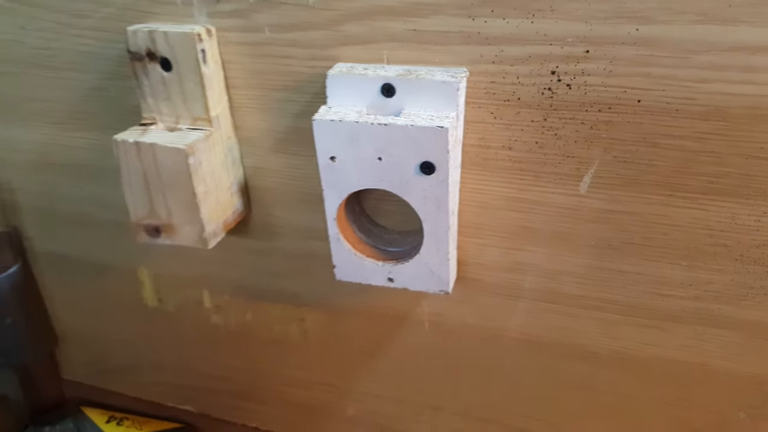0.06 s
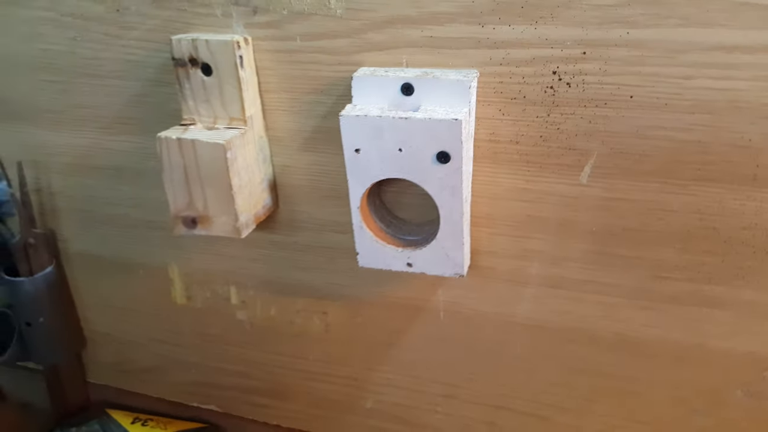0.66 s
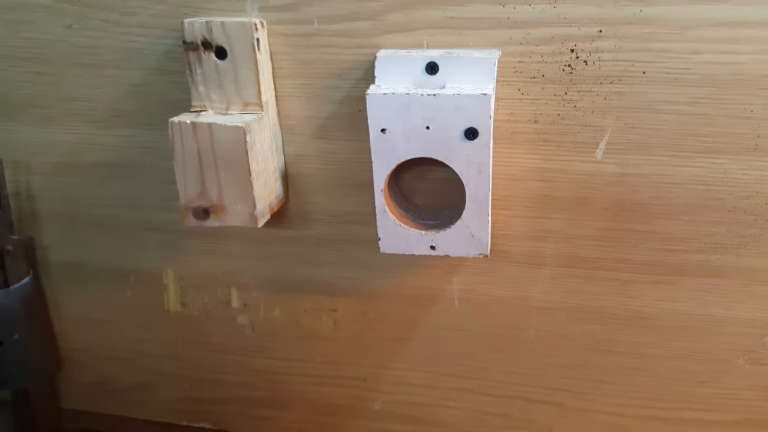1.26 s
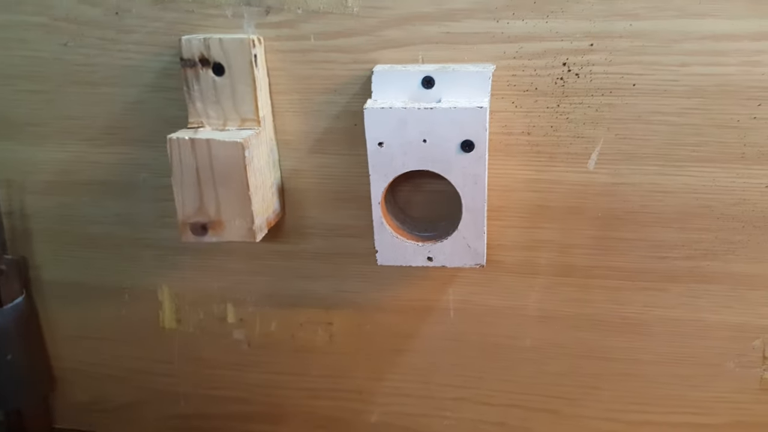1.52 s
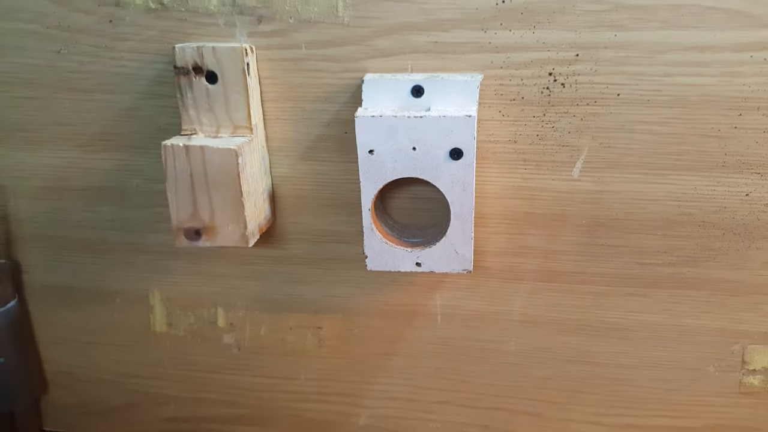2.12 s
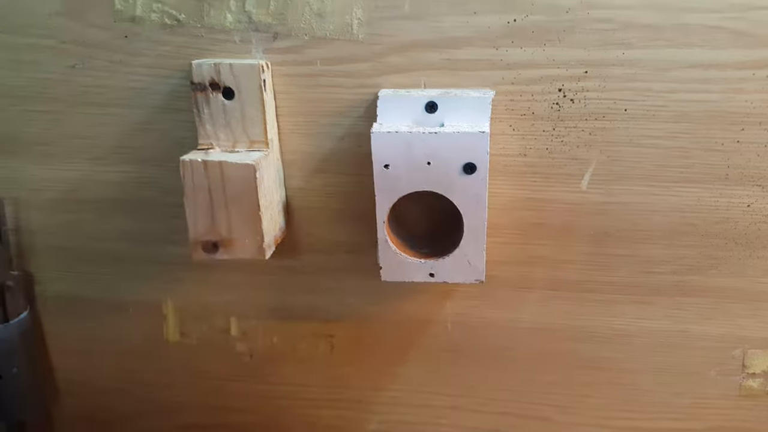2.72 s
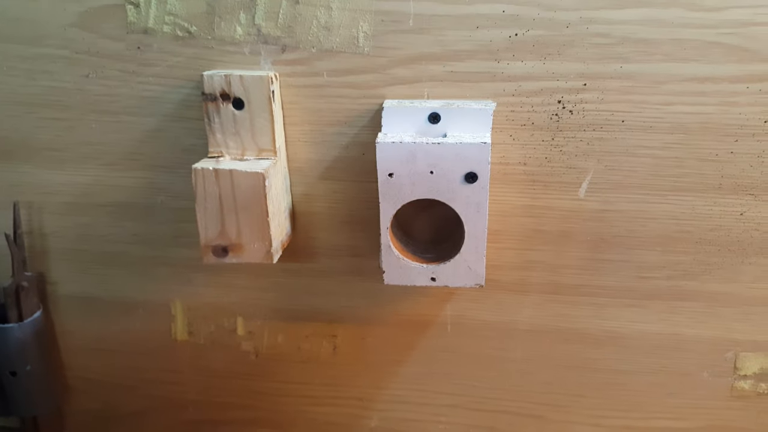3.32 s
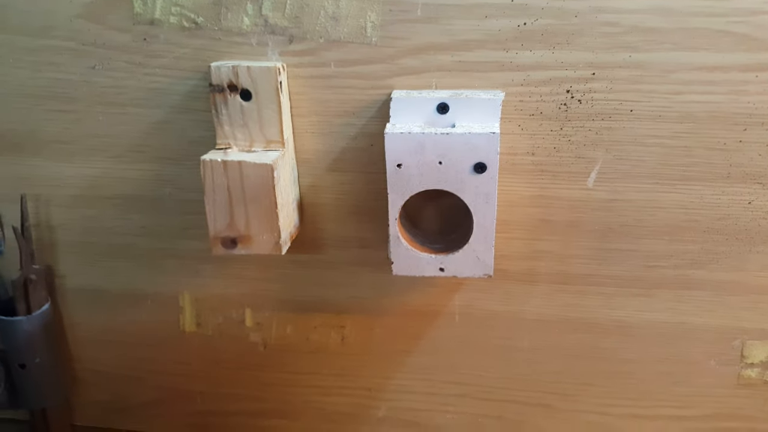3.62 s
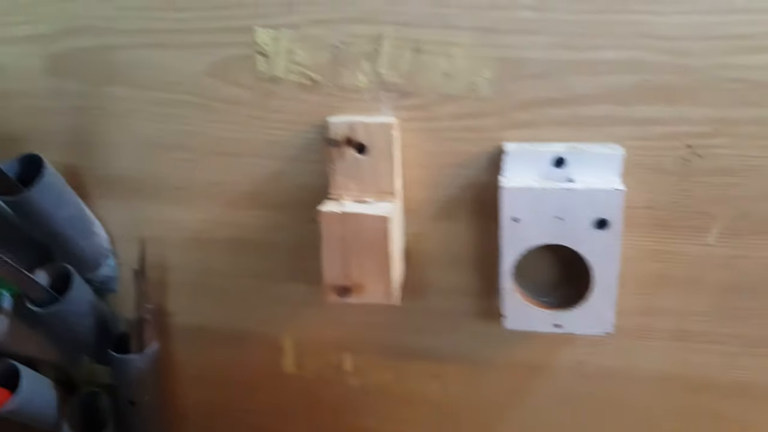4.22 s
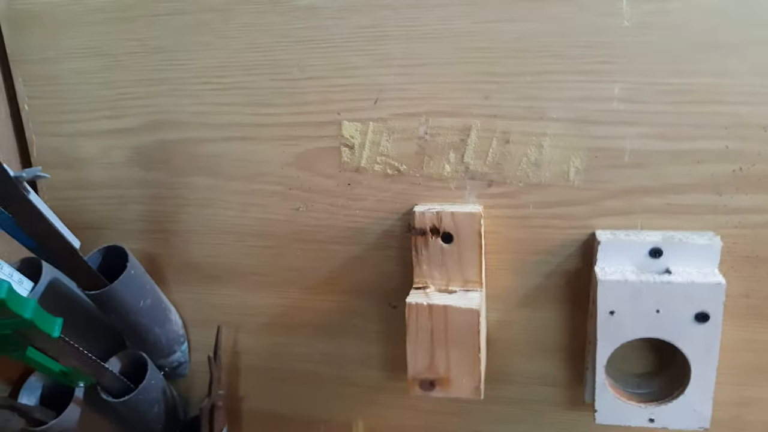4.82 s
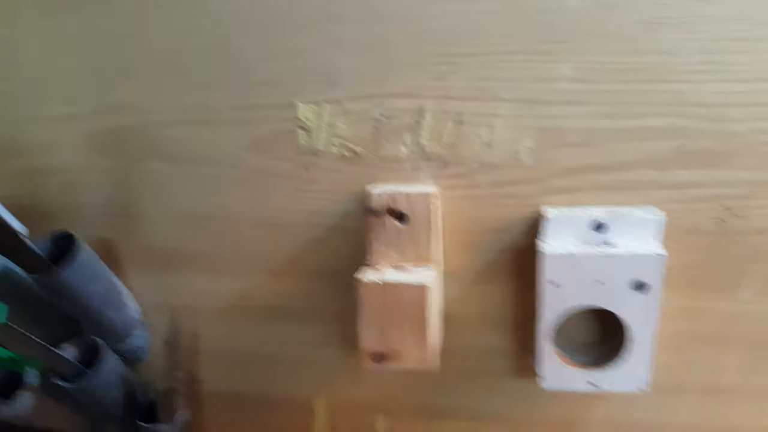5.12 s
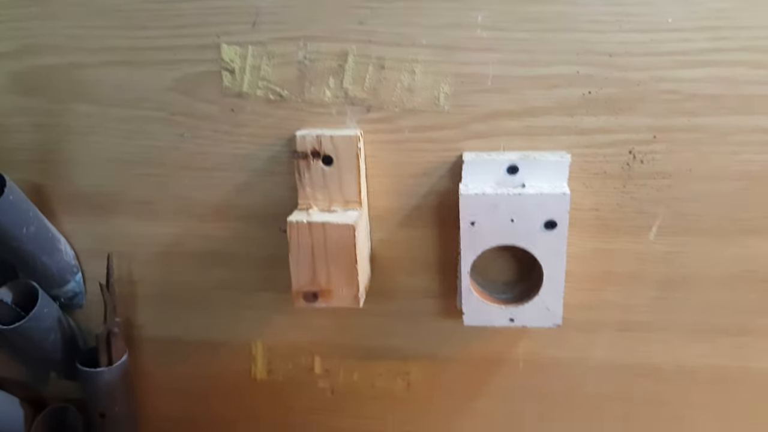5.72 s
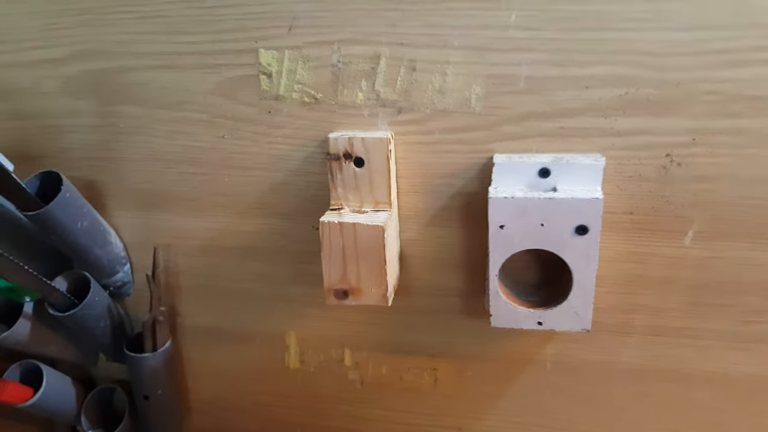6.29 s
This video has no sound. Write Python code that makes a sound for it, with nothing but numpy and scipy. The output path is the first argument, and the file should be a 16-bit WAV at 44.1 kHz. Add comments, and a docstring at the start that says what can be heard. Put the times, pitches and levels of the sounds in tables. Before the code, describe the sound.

A low hum and rumble fill a small workshop, heard through a close, hand-held stereo microphone. After a light tap and a faint scrape, a spool knocks sharply on a wooden wall panel at about 0.8 seconds, and again more softly at 1.1. A quieter stretch follows, with faint sleeve rustle, small clicks and a light slide near 2.6 seconds. From about 3 to 4.5 seconds the spool rubs and fumbles in its wooden holder, making a run of dull taps, strongest near 3.9, while the rumble swells slightly. The sleeve rustles and the hand bumps the microphone with low thumps between 4.4 and 5 seconds. Two short, hoarse scrapes come at about 4.9 and 5. At 5.6 a spool lands on the holder with a hard knock and bounces once. Soft rustling, two small bumps and a sharp click near 6.2 seconds finish it.

```python
"""Spools knock into a wooden holder on a wall panel, close to a hand-held stereo microphone in a small
workshop. Two knocks on the panel, rubbing and fumbling, two short scrapes, then a hard knock with one
bounce. Each blow rings the wood's modes and echoes off the nearest surfaces; rubs and scrapes are noise
that catches and slips. Close up, a sleeve rustles among small clicks and light woody taps, and the hand
bumps the microphone. A low hum and rumble lie behind it all."""
import sys
import numpy as np
from scipy import signal
from scipy.fft import rfft, irfft
from scipy.io import wavfile

SR = 44100
rng = np.random.default_rng(int(sys.argv[2]) if len(sys.argv) > 2 else 0)


def log_audio(samples):
    """Write samples as a 16-bit WAV file to the path given in sys.argv[1]."""
    # one column per channel
    frames = np.atleast_2d(samples).T
    # limit to full scale, then quantise
    limited = np.clip(frames, -1, 1)
    pcm = np.round(limited * 32767).astype(np.int16)
    wavfile.write(sys.argv[1], SR, pcm)


N = 280167
TIME = np.arange(N) / SR
FREQS = np.fft.rfftfreq(N, 1 / SR)

# room tone, the low rumble and the still air: frequency_hz, level_db
RUMBLE_SPECTRUM = [(15, -38), (30, -14), (42, -5), (51, 0), (62, -0.5), (80, -9), (110, -2), (160, -13.5),
                   (250, -25.5), (500, -57.5)]
AIR_SPECTRUM = [(88, -44), (150, 3.5), (231, -8), (270, -2), (348, -6.5), (534, -6.5), (871, -11),
                (998, -7.5), (1360, -13.5), (1940, -19), (2810, -20.5), (8230, -40.5), (16000, -27)]
# how alike the two sides of the microphone hear a noise: frequency_hz, correlation
STEREO_LIKENESS = [(50, .99), (250, 0.9), (600, 0.8), (1200, 0.13), (2500, 0.071), (5000, 0.036),
                   (15000, 0.033)]
# the workshop's reverberation: frequency_hz, t60_s
ROOM_DECAY = [(100, 0.51), (400, 0.57), (1000, 0.26), (2500, 0.4), (6000, 0.19), (15000, 0.13)]
# echoes off the nearest surfaces, before the right side's extra lag: left_s, left_gain, right_s, right_gain
PANEL_ECHOES = [(.00206, 0.45, .00218, 0.36), (.00706, 0.27, .007, 0.084), (.01184, .25, .01171, .2),
                (0.0163, 0.12, 0.02, 0.2)]
HOLDER_ECHOES = [(.0017, 0.051, 0.0024, -0.088), (.0066, 0.11, .0068, 0.28), (.00802, .33, .00802, .22),
                 (0.0178, 0.013, .01919, 0.076)]
HANDLING_ECHOES = [(.00205, .17, .00205, 0.058), (.0047, .25, .0047, 0.15)]

# swells of the rumble, the sleeve, a spool rubbing and a spool sliding: peak_s, rise_s, fall_s, level_db
RUMBLE_SWELLS = [(3.03, .33, 0.24, -45.5), (3.55, 0.2, 0.23, -52), (4.18, 0.46, 0.41, -45)]
SLEEVE_STROKES = [(0.15, 0.44, 0.41, -63), (0.85, 0.13, 0.3, -60), (1.58, 0.36, 0.28, -68),
                  (2.62, 0.32, 0.12, -59), (4.63, 0.3, .11, -46), (5.15, 1, 0.43, -57.5),
                  (5.87, 0.24, 0.19, -52), (6.24, 0.17, 0.11, -59.5)]
RUB_STROKES = [(1.02, 0.15, 0.18, -53), (3.35, 0.6, 0.38, -56), (3.72, 0.15, 0.13, -50.5),
               (4.06, 0.25, 0.27, -50.5), (4.46, 0.31, 0.4, -48.5), (4.88, 0.099, 0.068, -46.5),
               (5.98, 0.52, 0.16, -60.5)]
SLIDE_STROKES = [(2.6, 0.17, 0.94, -62)]
# friction of cloth, rubbed wood, smooth wood and a scrape, and the fizz on top: frequency_hz, level_db
CLOTH_SPECTRUM = [(80, -22), (250, -12), (600, -6), (1500, -0.5), (2500, -5), (4000, -8.5), (6000, -14),
                  (8400, -13.5), (10200, -24.5), (12500, -19.5), (16000, -27)]
RUB_SPECTRUM = [(80, -38), (170, 5), (300, -0.5), (430, -2), (540, -5), (670, -2), (950, -10.5),
                (1250, -18), (1700, -16), (2500, -26.5), (6000, -41.5)]
SLIDE_SPECTRUM = [(500, -30), (1000, 0), (1450, 0.5), (1800, 3), (2050, -8), (2400, -11), (5000, -31)]
SCRAPE_SPECTRUM = [(100, 0), (250, -2), (850, -3.5), (2000, 1), (3200, -4), (4600, -13), (5800, -21),
                   (8200, -13), (10000, -33), (16000, -53)]
FIZZ_SPECTRUM = [(2000, -17), (5500, 3), (8500, -2), (10300, -6), (12500, 1), (16000, -3)]
# the hand bumping the microphone: start_s, level_db, pitch_hz, rise_s
HAND_BUMPS = [(4.418, -38.5, 227, 0.004), (4.711, -34.5, 101, 0.0087), (4.872, -39, 134, 0.014),
              (4.99, -39, 95, 0.011), (6.031, -43.5, 110, 0.0072), (6.215, -42, 120, 0.0076)]
# small close clicks and light woody taps: start_s, level_db, centre_hz, decay_s
SMALL_CLICKS_AND_TAPS = [(0.127, -21, 1200, .0025), (1.213, -33, 8200, 0.0044), (1.262, -44, 8000, .002),
                         (1.345, -41, 10100, 0.0035), (1.374, -40, 10000, .003), (1.392, -38, 9000, .003),
                         (1.747, -24, 2500, .002), (2.080, -36, 7560, 0.0034), (2.734, -21.5, 1400, 0.0026),
                         (3.292, -22, 1380, 0.0064), (3.604, -36, 5900, 0.0037),
                         (4.0214, -18.5, 5500, 0.0013), (4.039, -13.5, 2920, 0.00075),
                         (4.056, -35, 8000, .001), (6.174, -14, 3150, 0.0031)]
# short scrapes: start_s, peak_s, end_s, level_db, relative_squeal_db, relative_fizz_db
SCRAPE_STROKES = [(0.592, 0.644, 0.66, -56, -6, -16), (4.767, 4.87, 4.912, -40, 5, -8),
                  (4.964, 5.002, 5.03, -47, 2.5, -12), (5.009, 5.022, 5.034, -41, -8, -23)]
# resonances of a scrape's squeal: pitch_hz, width_hz, level_db
SQUEAL_RESONANCES = [(640, 84, 3), (830, 140, -5), (1170, 75, -9), (1476, 90, -6), (4530, 670, -18.5),
                     (8240, 340, -34)]

# wood modes of the holder's pocket, the panel and the holder: pitch_hz, level_db, t60_s
POCKET_MODES = [(169, -50.5, 0.14), (233, -43, 0.057), (436, -36.5, 0.074), (532, -40.5, 0.042),
                (665, -34.5, 0.046), (749, -37, 0.035), (960, -34.5, 0.015), (1170, -42, 0.029),
                (1410, -45, 0.032), (1960, -48, 0.019), (2150, -53, 0.018)]
PANEL_MODES = [(104, -40.5, 0.19), (183, -31, 0.063), (309.5, -32.5, 0.063), (435, -31.5, .11),
               (510, -33, 0.093), (668, -30, 0.089), (808, -27, .07), (833, -11, 0.014), (1070, -50, 0.082),
               (1330, -40, 0.067), (1373, -14.5, 0.0089), (1760, -27, 0.026), (2240, -28, 0.014),
               (2900, -42, .02)]
HOLDER_MODES = [(89.5, -42, 0.27), (234, -34, 0.067), (372, -43, 0.033), (438, -21.5, 0.06),
                (526, -34, 0.032), (608.5, -13, 0.03), (644, -5.5, .011), (832, -18, 0.044),
                (948, -25.5, 0.087), (1043, -27, 0.087), (1080, -22.5, 0.061), (1265, -9, 0.015),
                (1450, -31, 0.065), (1684, -26, 0.11), (1763, -11, 0.012), (2103, -18, 0.019),
                (2430, -19, 0.023), (2760, -25, 0.021), (3050, -29.5, 0.023), (3403, -33, 0.028)]
# the tick of a hard contact: frequency_hz, level_db
TICK_SPECTRUM = [(300, -24), (1500, -3), (3000, 1), (4200, -6), (6000, -14.5), (8300, -23), (10000, -36),
                 (12500, -25), (16000, -34)]
# a spool shifting in the pocket: start_s, force_db, hardness_hz
POCKET_TAPS = [(0.945, -17, 900), (3.089, -16, 1410), (3.250, -19, 1000), (3.672, -9.5, 1000),
               (3.703, -10.5, 796), (3.754, -7.5, 690), (3.830, -13.5, 900), (3.870, -0.7, 2060),
               (3.946, -11.5, 694), (4.013, -12, 910), (4.078, -5, 1070), (4.126, -6, 1510),
               (4.211, -17, 700), (4.464, -8.5, 1300)]
# blows on the panel, then a spool dropped on the holder with its bounce:
# start_s, force_db, hardness_hz, relative_tick_db, left_over_right_db
PANEL_KNOCKS = [(0.7837, 0.5, 2290, -5.5, 1), (0.857, -19.5, 696, -10, -3), (1.0811, -7.5, 1190, -5.5, 1)]
HOLDER_KNOCKS = [(5.6095, -1, 3553, -3.5, 2.3), (5.7008, -13, 1320, -3, 1.5)]


def amp(db):
    """Decibels to gain."""
    return 10 ** (np.asarray(db) / 20)


def unit(x):
    """Scales to rms 1."""
    return x / np.sqrt(np.mean(x ** 2) + 1e-20)


def read(points, hz):
    """Interpolates a table on a log-frequency axis."""
    f, value = np.transpose(points)
    return np.interp(np.log(hz + 1), np.log(f + 1), value)


def colour(points):
    """A spectrum table as a gain for every frequency."""
    return amp(read(points, FREQS))


def resonance(pitch_hz, width_hz):
    """One narrow peak as a gain for every frequency."""
    return 1 / (1 + (2 * (FREQS - pitch_hz) / width_hz) ** 2)


def pan(db):
    """Left and right gains, the left louder by db."""
    return amp([[db / 2], [-db / 2]])


def add(mix, start_s, sound):
    """Mixes a sound in at its start time."""
    part = mix[:, max(round(start_s * SR), 0):][:, :sound.shape[-1]]
    part += sound[..., :part.shape[1]]


def causal(gain):
    """The most compact impulse response with this magnitude."""
    cepstrum = irfft(np.log(np.maximum(gain, 1e-5)))
    half = len(cepstrum) // 2
    cepstrum[1:half] *= 2
    cepstrum[half + 1:] = 0
    return irfft(np.exp(rfft(cepstrum)))


def noise(gain, grain_db=0, grain_hz=200):
    """Stereo noise of a given colour, near mono in the bass; grain makes it catch and slip."""
    grip = unit(irfft(rfft(rng.standard_normal(N)) / (1 + (FREQS / grain_hz) ** 2), N))
    a, b = rfft(rng.standard_normal((2, N)) * amp(grain_db * np.clip(grip, -2.5, 2.5)))
    likeness = np.clip(read(STEREO_LIKENESS, FREQS), 0, 1)
    mid, side = a * np.sqrt((1 + likeness) / 2), b * np.sqrt((1 - likeness) / 2)
    return unit(irfft(np.array([mid + side, mid - side]) * gain, N))


def waver(top_hz):
    """A slow random swing of rms 1."""
    return unit(irfft(rfft(rng.standard_normal(N)) * (FREQS < top_hz), N))


def strokes(rows, drop_db=9.5, roundness=1.61):
    """Gain of rounded swells, each drop_db down at rise_s before and fall_s after its peak."""
    power = np.zeros(N)
    for peak_s, rise_s, fall_s, level_db in rows:
        away = np.maximum((peak_s - TIME) / rise_s, (TIME - peak_s) / fall_s)
        power += amp(level_db - drop_db * abs(away) ** roundness) ** 2
    return np.sqrt(power)


def wall_boom(fade_db_per_s=82):
    """Gain of the wall's rumble: it jumps with the force of each knock and fades."""
    return sum((TIME >= start_s) * amp(-43.5 + force_db - fade_db_per_s * abs(TIME - start_s))
               for start_s, force_db, *_ in PANEL_KNOCKS + HOLDER_KNOCKS)


def room_tone(hum_hz=51, swing_hz=3.4):
    """Behind everything: a wavering hum, a swelling rumble and still air with a faint narrow ring."""
    pitch_hz = hum_hz + swing_hz * waver(top_hz=10.2)
    tone = unit(np.sin(2 * np.pi * np.cumsum(pitch_hz) / SR))
    swell = np.hypot(amp(-54), strokes(RUMBLE_SWELLS))
    rumble = np.hypot(swell, wall_boom()) * amp(-3) * noise(colour(RUMBLE_SPECTRUM))
    hum = swell * amp(-6 + 2 * waver(top_hz=8)) * tone
    ring = amp(-77) * noise(resonance(pitch_hz=1957, width_hz=140))
    air = amp(-63.5) * noise(colour(AIR_SPECTRUM))
    return (rumble + hum + air + ring) * pan(1.5)


def reverb(x, wet_db):
    """The small workshop adds a short tail whose treble dies first."""
    hz, t, spectra = signal.stft(noise(1)[:, :SR], SR, nperseg=256)
    decay = amp(-60 * t / read(ROOM_DECAY, hz)[:, None])
    onset = np.clip(t / 0.0068, 0, 1)
    tail = signal.istft(spectra * decay * onset, SR, nperseg=256)[1]
    return x + amp(wet_db) * signal.fftconvolve(x, tail / np.linalg.norm(tail[0]), axes=1)[:, :N]


def reflect(x, echoes, scatter_db, t60_s, right_lag_s=0.00006):
    """Near surfaces echo a sound, hanging tools scatter it, and it reaches the right microphone later."""
    t = np.arange(SR // 4) / SR
    scatter = noise(1)[:, :len(t)] * amp(-60 * t / t60_s) * np.clip(t / 0.006, 0, 1) ** 2
    paths = amp(scatter_db) * scatter / np.linalg.norm(scatter[0])
    direct = (0, 1, 0.00008, 1)
    for left_s, left_gain, right_s, right_gain in [direct, *echoes]:
        paths[0, round(left_s * SR)] += left_gain
        paths[1, round((right_s + right_lag_s) * SR)] += right_gain
    return signal.fftconvolve(x, paths, axes=1)[:, :N]


def hand_bumps():
    """The hand nudges the microphone: a few low cycles that swell and die."""
    t, out = np.arange(SR // 5) / SR, np.zeros((2, N))
    for start_s, level_db, pitch_hz, rise_s in HAND_BUMPS:
        envelope = t / rise_s * np.exp(1 - t / rise_s)
        add(out, start_s, amp(level_db) * envelope * np.sin(2 * np.pi * pitch_hz * t))
    return out


def sleeve():
    """Cloth hisses finely beside the microphone, brighter when the arm moves fast."""
    arm = np.hypot(amp(-69.5), strokes(SLEEVE_STROKES))
    cloth = arm * noise(colour(CLOTH_SPECTRUM), grain_db=1, grain_hz=150)
    fizz = noise(colour(FIZZ_SPECTRUM), grain_db=6, grain_hz=300)
    return (cloth + amp(-69) * (arm / arm.max()) ** 1.2 * fizz) * pan(0.97)


def small_clicks_and_taps():
    """Small close clicks and light woody taps: a few milliseconds of broad crackle each."""
    t, out = np.arange(2048) / SR, np.zeros((2, N))
    hz = np.fft.rfftfreq(2048, 1 / SR) + 1
    for start_s, level_db, centre_hz, decay_s in SMALL_CLICKS_AND_TAPS:
        burst = rng.standard_normal((2, len(t))) * np.exp(-t / decay_s)
        band = causal(1 / (1 + 0.99 * (hz / centre_hz - centre_hz / hz) ** 2))
        click = signal.fftconvolve(burst / np.linalg.norm(burst[0]), band[None], axes=1)
        add(out, start_s, amp(level_db) * click)
    return out


def handling_scrapes():
    """Short scrapes right beside the microphone: stick-slip grit, a hoarse squeal and a fizz on top."""
    grit = noise(colour(SCRAPE_SPECTRUM), grain_db=0.5, grain_hz=300)
    fizz = noise(colour(FIZZ_SPECTRUM), grain_db=5, grain_hz=300)
    squeal = noise(sum(amp(db) * resonance(hz, width_hz) for hz, width_hz, db in SQUEAL_RESONANCES))
    # changing pressure bends the squeal's pitch
    bent_time = np.cumsum(1 + 0.025 * waver(top_hz=20)) / SR
    squeal = np.array([np.interp(bent_time, TIME, side) for side in squeal])
    out = np.zeros((2, N))
    for start_s, peak_s, end_s, level_db, squeal_db, fizz_db in SCRAPE_STROKES:
        stroke = np.sin(np.pi / 2 * np.interp(TIME, [start_s, peak_s, end_s], [0, 1, 0])) ** 2
        out += amp(level_db) * stroke * (grit + amp(squeal_db) * squeal + amp(fizz_db) * fizz)
    return out * pan(3.5)


def spool_rubs():
    """A spool rubs in slips that sound through the wood, and once slides lightly over it."""
    push = np.hypot(amp(-65.5), strokes(RUB_STROKES))
    rub = push * noise(colour(RUB_SPECTRUM), grain_db=2.5, grain_hz=90)
    slide = strokes(SLIDE_STROKES) * noise(colour(SLIDE_SPECTRUM), grain_db=1.5, grain_hz=100)
    return (rub + slide) * pan(1.9)


def knocks(blows, modes):
    """Each blow rings the wood's modes; a soft contact leaves out the high ones, a hard one also ticks."""
    t, hz = np.arange(SR // 2) / SR, np.fft.rfftfreq(2048, 1 / SR)
    # neighbouring modes push the air in opposite directions
    ring = -sum((-1) ** k * amp(level_db - 60 * t / t60_s) * np.cos(2 * np.pi * pitch_hz * t)
                for k, (pitch_hz, level_db, t60_s) in enumerate(modes))
    tick_filter = causal(amp(read(TICK_SPECTRUM, hz)))[None]
    out = np.zeros((2, N))
    for start_s, force_db, hardness_hz, tick_db, pan_db in blows:
        contact = causal(hz / np.hypot(hz, 60) / np.sqrt(1 + (hz / hardness_hz) ** 6))
        body = signal.fftconvolve(ring, contact)[:len(t)]
        crush = rng.standard_normal((2, len(t))) * t * np.exp(-t / 0.0007)
        tick = signal.fftconvolve(crush / np.linalg.norm(crush[0]), tick_filter, axes=1)[:, :len(t)]
        add(out, start_s, amp(force_db) * pan(pan_db) * (body + amp(tick_db) * tick))
    return out


def pocket_taps(tick_db=-33, pan_db=1.8):
    """A spool shifts in the holder's pocket: dull taps with hardly any tick."""
    return knocks([(*tap, tick_db, pan_db) for tap in POCKET_TAPS], POCKET_MODES)


def scene():
    """From the microphone: knocks at the wall, drier handling close up, room tone behind."""
    panel = reflect(knocks(PANEL_KNOCKS, PANEL_MODES), PANEL_ECHOES, scatter_db=-5, t60_s=0.087)
    holder = reflect(knocks(HOLDER_KNOCKS, HOLDER_MODES), HOLDER_ECHOES, scatter_db=-4, t60_s=0.038)
    pocket = reflect(pocket_taps(), [], scatter_db=-0.5, t60_s=0.059)
    wall = reverb(amp(-0.9) * panel + amp(3.5) * pocket, wet_db=-15.5)
    wall += reverb(amp(2.16) * holder, wet_db=-15)
    handling = reverb(handling_scrapes() + small_clicks_and_taps(), wet_db=-18) + sleeve() + spool_rubs()
    close = amp(-0.77) * reflect(handling, HANDLING_ECHOES, scatter_db=-9.5, t60_s=0.031)
    return wall + close + hand_bumps() + room_tone()


def record(dry):
    """The microphone chain passes nothing much above 15.9 kHz."""
    lowpass = signal.firwin(511, 15900, window=("kaiser", 9), fs=SR)
    return signal.oaconvolve(dry, lowpass[None], "same")


dry = scene()
out = record(dry)
log_audio(out)
```